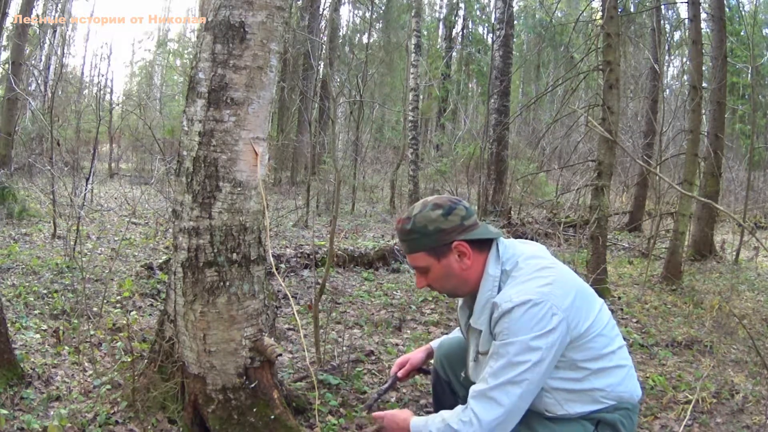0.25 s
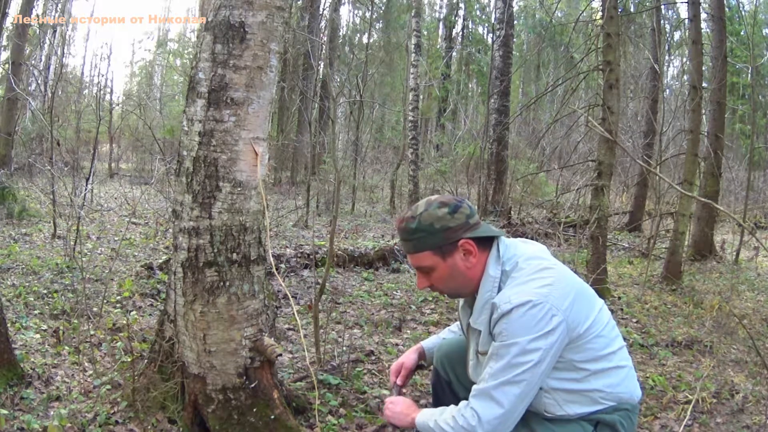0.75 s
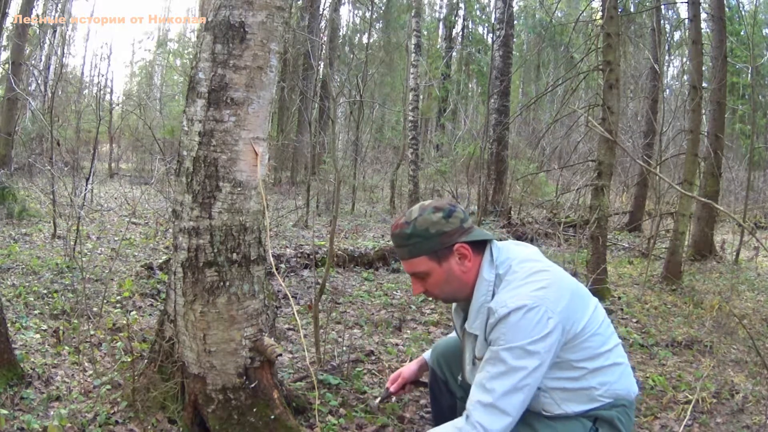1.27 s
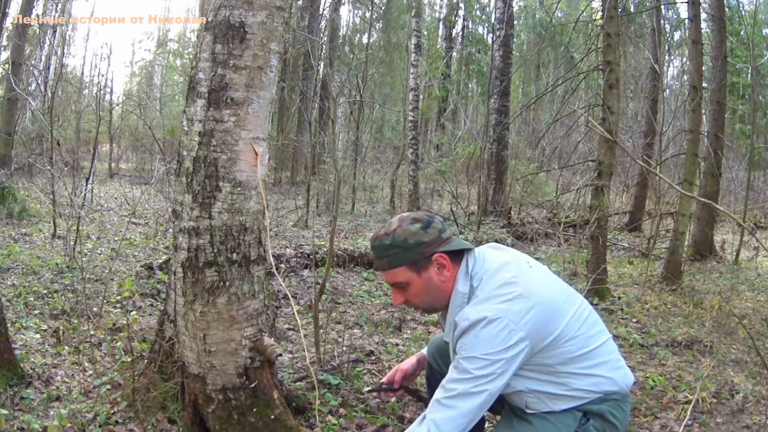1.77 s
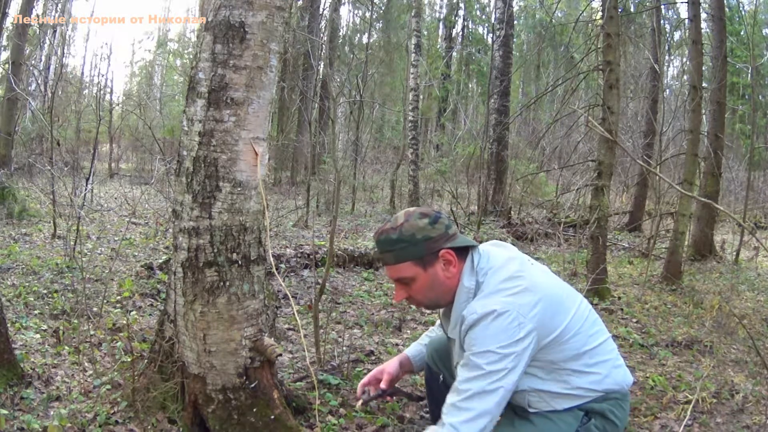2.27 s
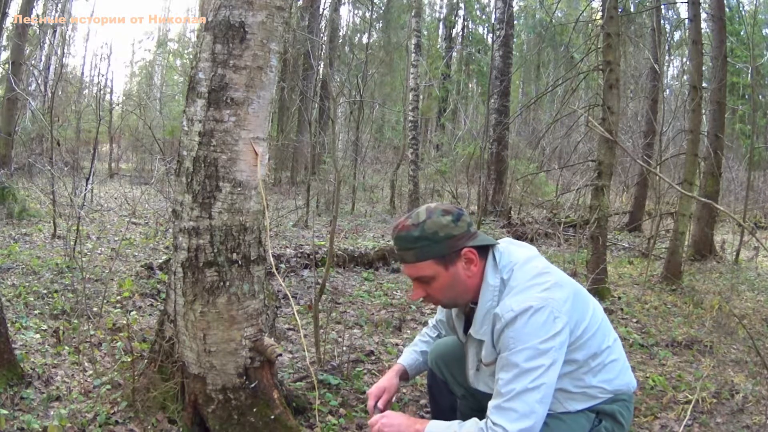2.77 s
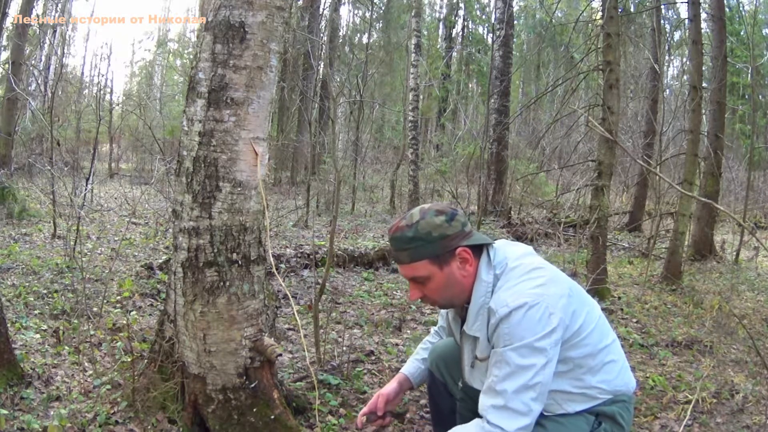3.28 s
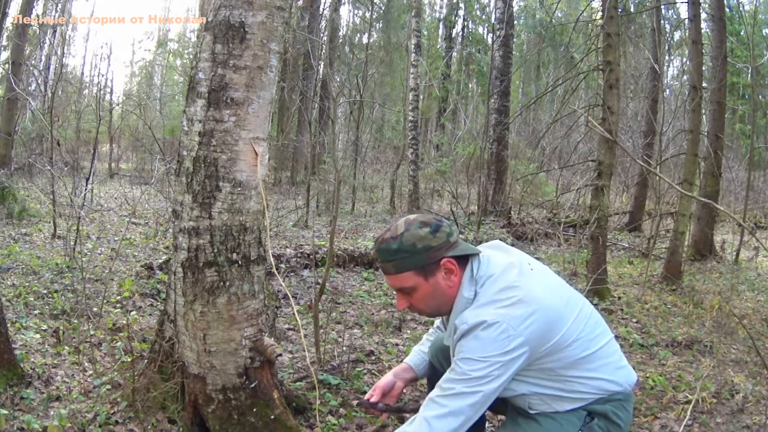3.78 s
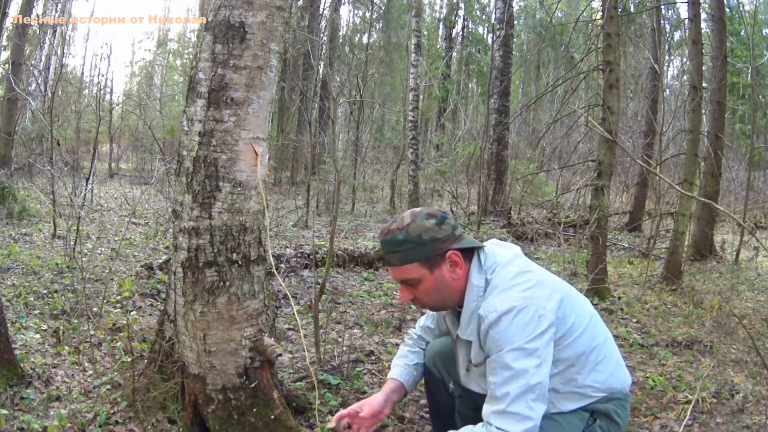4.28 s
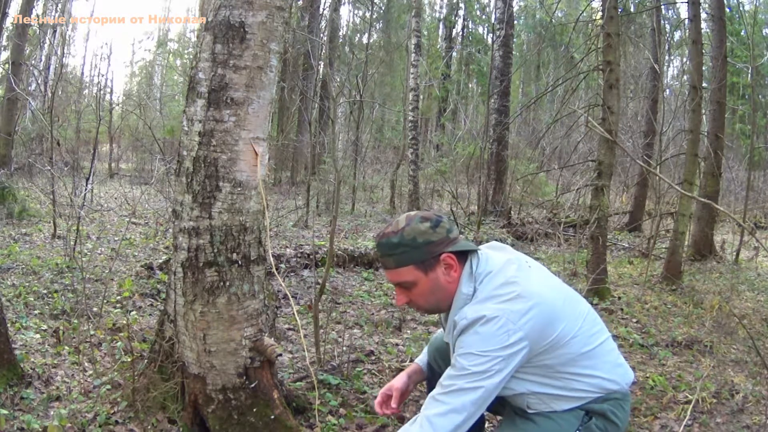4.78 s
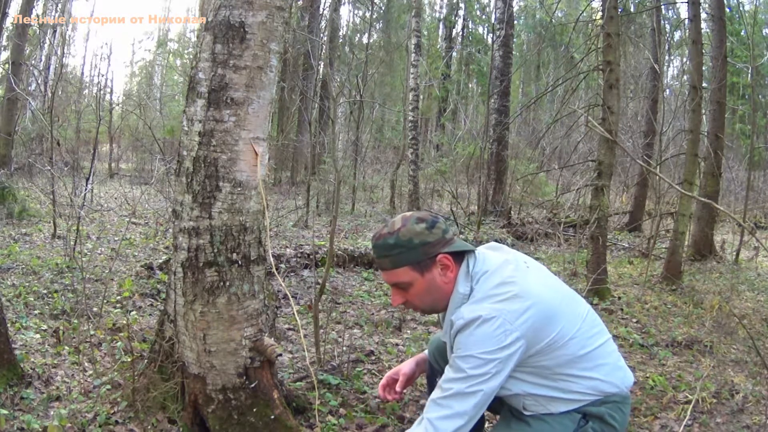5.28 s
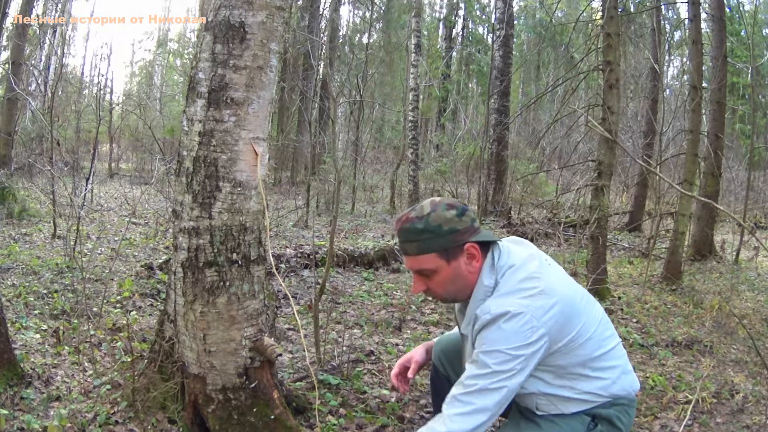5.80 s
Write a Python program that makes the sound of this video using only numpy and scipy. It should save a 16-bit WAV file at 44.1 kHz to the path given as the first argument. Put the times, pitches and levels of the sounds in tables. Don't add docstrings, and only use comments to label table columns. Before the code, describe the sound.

Close to a small stereo microphone outdoors in quiet woods, fingertips pick lightly at crisp dry leaves. A twig cracks, then the hand rakes into duller, damp litter. Picking resumes and a second, sharper twig snap jolts the microphone. Raking returns with crunching stalks while a distant bird gives faint gliding whistles. Soft air and hiss run throughout.

```python
import sys
import numpy as np
from scipy import signal
from scipy.fft import rfft, irfft, next_fast_len
from scipy.io import wavfile
from scipy.ndimage import uniform_filter1d, map_coordinates

SR = 44100
rng = np.random.default_rng(int(sys.argv[2]) if len(sys.argv) > 2 else 0)


def gain_from_decibels(decibels):
    exponent = np.asarray(decibels, float) / 20
    return 10 ** exponent


def dump_mix(stems):
    frames = np.atleast_2d(stems).T
    limited = np.clip(frames, -1, 1)
    pcm = np.round(limited * 32767).astype(np.int16)
    wavfile.write(sys.argv[1], SR, pcm)


N = 266672

# f/Hz, level/dB
AIR_SPECTRUM = [(15, -64.5), (25, -35), (130, -24.5), (300, -11), (520, -5), (1030, -7), (1800, -14.5),
                (4000, -11.5), (6700, -16.5), (8200, -16.5), (10100, -22), (12500, -26.5), (15600, -23),
                (15900, -55), (16150, -89)]
# f/Hz, likeness/1
AIR_ALIKE = [(30, .95), (120, 0.25), (500, 0.39), (2000, 0.075), (4000, 0.7), (8000, 0.71), (15000, 0.89)]
# t/s, f/Hz, level/dB
BIRD_NOTES = [
    [(3.18, 2446, -74), (3.205, 2370, -69), (3.238, 2300, -68)],
    [(3.255, 2090, -73), (3.275, 2270, -70), (3.305, 2260, -67), (3.335, 2240, -79)],
    [(3.35, 2200, -70), (3.37, 2160, -74), (3.39, 2280, -75)],
    [(3.47, 2550, -72), (3.5, 2480, -63), (3.54, 2320, -59), (3.59, 1960, -67), (3.63, 2010, -71)],
    [(4.07, 3000, -72), (4.106, 2880, -62), (4.15, 2720, -59.5), (4.163, 2680, -71), (4.176, 2650, -55.5),
     (4.19, 2590, -62), (4.215, 2500, -56), (4.235, 2400, -56), (4.255, 2360, -57)],
    [(4.2, 2720, -72), (4.24, 2680, -61)],
    [(4.265, 1740, -54), (4.295, 1754, -73)],
    [(4.33, 2350, -73), (4.39, 2330, -66)],
    [(4.33, 1830, -76), (4.35, 1870, -63), (4.395, 1900, -70), (4.425, 1920, -59), (4.455, 2550, -61.5),
     (4.495, 2765, -62), (4.53, 2790, -75), (4.57, 2750, -72), (4.6, 2770, -80)],
    [(4.44, 1915, -70), (4.475, 1915, -80), (4.5, 1930, -68), (4.53, 1910, -78), (4.555, 1910, -64),
     (4.58, 1900, -82)],
]
# delay/s, level/dB
TRUNK_ECHOES = [
    (0.044, -16),
    (0.089, -13),
]
# f/Hz, t60/s
TRUNK_T60 = [(300, 0.33), (2000, 0.19), (8000, 0.19)]
# f/Hz, level/dB
SOIL_SPECTRUM = [(200, -32), (400, -6), (650, 1), (900, -3), (1500, -28), (4000, -78)]
# f/Hz, level/dB
CRISP_SPECTRUM = [(710, -42), (1200, -10), (1430, -8.5), (2120, -6), (3150, -5), (4570, -1), (5570, -0.5),
                  (7830, -3), (9300, -11.5), (10300, -15), (11400, -8.5), (13000, -9.5), (15600, -18),
                  (15900, -51), (16150, -89)]
# f/Hz, level/dB
DAMP_SPECTRUM = [(60, -68.5), (200, -37), (400, -16), (800, -2.5), (1500, 0.5), (2500, -2), (5000, -28),
                 (14000, -75.5)]
# f/Hz, likeness/1
LEAF_ALIKE = [(500, 0.72), (1000, 0.94), (2000, 0.96), (5000, 0.91), (8500, 1), (12000, 1)]
# t/s, contact/s, start level/dB, end level/dB
PICKS = [(0, .06, -59.5, -66), (0.22, 0.045, -63, -57), (0.25, 0.065, -56.5, -66), (0.457, 0.049, -43, -50),
         (0.575, 0.023, -55.5, -47.5), (0.62, 0.16, -57.5, -54), (0.8, 0.089, -36, -56.5),
         (0.87, .1, -59, -52.5), (0.98, 0.042, -73, -58), (1.06, 0.06, -53, -61), (1.13, 0.074, -62, -51),
         (1.23, 0.067, -65, -61), (2.48, 0.027, -45.5, -47), (2.54, .03, -48.5, -47.5),
         (2.57, 0.13, -49, -52), (2.73, 0.045, -54, -45.5), (2.775, 0.084, -50, -53),
         (2.875, 0.044, -55, -35), (2.92, 0.055, -31.5, -48), (2.97, 0.092, -46.5, -55),
         (3.07, 0.15, -54, -56.5), (3.41, .025, -48.5, -55), (4.16, 0.099, -53, -58),
         (4.25, 0.015, -48, -46.5), (4.445, 0.013, -52.5, -57)]
# t/s, contact/s, start level/dB, end level/dB
RAKES = [(1.37, 0.088, -59.5, -56), (1.47, 0.12, -57, -61), (1.56, 0.063, -54.5, -47),
         (1.61, 0.13, -52.5, -42), (1.75, 0.079, -46.5, -51), (1.885, 0.1, -41.5, -55.5),
         (2.015, 0.078, -43.5, -50), (2.105, .06, -43, -54), (2.195, 0.024, -46, -45.5),
         (2.25, 0.21, -57, -69), (3.3, 0.17, -58.5, -57.5), (3.44, 0.22, -62.5, -41),
         (3.7, 0.076, -41.5, -44.5), (3.825, .11, -40.5, -57), (3.95, 0.16, -56, -62),
         (4.1, 0.074, -59.5, -56), (4.3, .1, -60.5, -64.5), (4.42, 0.17, -73, -48),
         (4.655, 0.032, -44.5, -44), (4.712, .13, -39.5, -51), (4.85, 0.049, -51.5, -57.5),
         (4.96, 0.14, -47, -40), (5.1, 0.075, -41, -55), (5.21, 0.034, -47, -45), (5.27, 0.086, -66, -58.5),
         (5.425, 0.13, -47.5, -37.5), (5.56, 0.028, -36.5, -42.5), (5.62, 0.042, -59, -59),
         (5.715, 0.07, -52.5, -43.5), (5.81, 0.13, -51.5, -65)]
# t/s, level/dB
WEIGHT = [(0, -87), (0.25, -62.5), (0.6, -77), (0.78, -81), (1.05, -68), (1.5, -62), (2.35, -62),
          (2.5, -65), (2.8, -85), (3, -57), (3.1, -76), (3.3, -63), (4, -61), (4.5, -64), (5.4, -70),
          (5.68, -64), (6.05, -59.5)]
# t/s, peak level/dB, f/Hz
SPECKS_EARLY = [(0.0215, -46, 6100), (0.1022, -49, 3000), (0.1071, -45, 7200), (0.2228, -49, 4800),
                (0.237, -43, 3600), (0.254, -46, 3100), (0.2607, -44, 6900), (0.2912, -50, 4400),
                (0.3222, -49, 6600), (0.3398, -55, 4900), (0.3482, -51, 3400), (0.3815, -57, 6400),
                (0.478, -38, 5100), (0.6021, -31, 7650), (0.6128, -43, 7000), (0.6248, -49, 8000),
                (0.6474, -38, 7600), (0.719, -41, 4400), (0.8586, -45, 6600), (0.865, -43, 4700),
                (0.892, -33, 7840), (0.9186, -49, 5000), (0.9368, -52, 4900), (1.0208, -46, 6070),
                (1.0257, -50, 4900), (1.038, -59, 4600), (1.0767, -44.5, 5170), (1.164, -48, 5900),
                (1.2306, -44, 6200), (1.2606, -47, 6160), (1.2735, -48, 3900), (1.288, -54, 5300),
                (1.324, -45, 5560), (1.3803, -49, 4600), (1.4188, -54, 6300), (1.4533, -44, 2200),
                (1.5594, -50, 5900), (1.606, -40, 7500), (1.645, -35, 7260), (1.8099, -35, 4030),
                (1.827, -40, 5860), (1.97, -40, 5500), (1.9772, -44, 6500), (2.1176, -42, 6140),
                (2.1239, -29, 7900), (2.1648, -42, 5300), (2.3146, -44, 7660), (2.354, -51, 6900),
                (2.4602, -40.5, 4200), (2.4971, -29, 7600), (2.5174, -50, 5900), (2.5492, -49, 4000),
                (2.576, -35, 7100), (2.7894, -37, 7240), (2.8061, -35, 7700), (2.8263, -46, 5100),
                (2.8476, -41, 6600), (2.8537, -51, 5500), (2.8641, -48, 4500), (2.8701, -46, 5200)]
# t/s, peak level/dB, f/Hz
SPECKS_LATE = [(2.8764, -41, 4700), (2.9678, -41, 6300), (3.1065, -40, 5400), (3.1291, -46, 7800),
               (3.148, -47, 4600), (3.1569, -50, 8400), (3.2204, -57, 2800), (3.2345, -55, 5100),
               (3.2398, -40.5, 4000), (3.2739, -51, 6500), (3.291, -40, 5250), (3.3294, -47, 6800),
               (3.3737, -45, 6200), (3.4034, -42, 5300), (3.4166, -46, 5600), (3.4324, -44, 5300),
               (3.4598, -47, 5200), (3.5482, -43, 5300), (3.6322, -65, 5500), (3.6532, -48, 8400),
               (3.6708, -49, 5300), (3.7595, -30, 3430), (3.811, -35, 4670), (4.0118, -49, 4100),
               (4.175, -39, 2500), (4.1911, -47, 4700), (4.2361, -43, 4600), (4.2444, -40, 7100),
               (4.291, -49, 7500), (4.3113, -48, 2800), (4.4485, -48, 2200), (4.5245, -49, 3800),
               (4.5303, -43, 3800), (4.5424, -46, 3600), (4.564, -47, 4240), (4.5807, -46, 4470),
               (4.6492, -49, 5500), (4.66, -40, 4500), (4.6789, -27.5, 5300), (4.761, -42, 5000),
               (4.821, -40, 5400), (4.8527, -41, 7300), (5.0104, -33, 7240), (5.0215, -38, 6100),
               (5.0542, -35, 4700), (5.1097, -35, 6640), (5.1694, -38, 4900), (5.3559, -48, 6400),
               (5.4647, -29, 5300), (5.478, -40, 5100), (5.5005, -32, 5900), (5.6673, -50, 5300),
               (5.6828, -52, 4500), (5.7198, -40, 3900), (5.7404, -37, 5400), (5.7483, -41, 5600),
               (5.7945, -36, 5550), (5.82, -44, 5900), (5.8364, -49, 3800)]
# t/s, peak level/dB, decay/ms, knock level/dB
TICKS = [(0.1125, -42.5, 3.1, -17), (0.13, -40, 0.65, -9), (0.164, -46.5, 5.6, -5.5),
         (0.2694, -37, 0.37, -10), (0.3024, -36.5, 2.1, -19.5), (0.4577, -32.5, 0.73, -10),
         (0.4614, -32.5, 2.5, -25), (0.5416, -39.5, 0.77, -4), (0.6007, -35, 0.69, -15),
         (0.656, -36, 1.3, -17), (0.6937, -29, 1.8, -36.5), (0.859, -38, .6, 3), (0.8729, -39, 1.2, -5),
         (0.89, -41, 0.53, -22), (0.9431, -30, 1.6, -8.5), (1.1389, -37, .73, -14),
         (2.2803, -33, 0.36, -23), (2.483, -39, 1.8, -13), (2.4898, -32.5, 2.1, -22.5),
         (2.629, -35, 1.8, -14), (2.6834, -36, 4, -19.5), (2.726, -25, 0.3, -22.5),
         (2.7353, -40.5, 3.6, -25), (2.7656, -29.5, 0.7, -25), (2.78, -41, 1.3, -31.5),
         (2.836, -27, 0.17, -13), (3.0784, -34.5, 1.2, -23), (3.082, -34.5, 3.7, -13), (3.35, -39, 1.4, -8),
         (3.3607, -36, 1.4, -20.5)]
# t/s, peak level/dB, decay/ms, knock level/dB
CRUNCHES = [(1.687, -28, 0.42, -22), (1.72, -33, 1.6, -18), (1.883, -33, 2.3, -16),
            (2.0246, -29.5, 1.8, -18), (2.0542, -37, 5.4, -11), (2.089, -32.5, 4.3, -15.5),
            (2.114, -41, 2.5, -15), (2.141, -39, 1.3, -19), (2.143, -33.5, 0.84, -12),
            (2.1468, -27, .5, -22), (2.2052, -33, 0.94, -7), (3.6913, -22, 1, -1),
            (3.8356, -22.5, 0.75, -10.5), (3.996, -49, 1.35, 7), (4.259, -27, 1.1, -17.5),
            (4.2648, -26.5, 1.1, -21.5), (4.6733, -32, 0.62, -8), (4.7005, -28, 1.5, -7),
            (5.0495, -36, 1.1, -1), (5.1015, -32.5, 1, -6), (5.1594, -35, 3.3, -12), (5.201, -42, 1.3, -18),
            (5.214, -33.5, 0.48, 2.5), (5.2265, -32.5, 2.2, -22), (5.034, -35, 1.3, -1.5),
            (5.07, -38, 1.5, -15), (5.449, -30, 0.91, -18), (5.5116, -35.5, 2, -3), (5.5238, -30, 1.2, -18),
            (5.5532, -32, 1.5, -1.5), (5.577, -28, 1.3, -15), (5.602, -34, 1.3, -6),
            (5.702, -36.5, 1.3, -12), (5.6195, -42, .8, -22), (5.632, -43, .8, -12), (5.646, -45, .8, -24),
            (5.464, -35.5, 1, -9)]
# t/s, peak level/dB, f/Hz, decay/ms
TWIG_ONE = [
    (0.738, -38, 5850, 2.5),
    (0.7657, -18, 4500, 0.59),
    (0.7746, -26.5, 5150, 1.8),
    (0.7991, -11, 4770, 0.67),
    (0.8012, -19, 5490, 3.5),
    (0.8044, -7.5, 4420, 1.23),
    (0.8082, -11.5, 4270, 2.7),
    (0.8103, -17, 4600, 1.3),
    (0.8145, -23, 4750, 3.4),
    (0.823, -29.5, 5130, 2.7),
]
# t/s, peak level/dB, f/Hz, decay/ms
TWIG_TWO = [(2.8816, -31, 6800, 1.2), (2.8938, -27, 5230, 0.5), (2.896, -35, 4900, 0.88),
            (2.9, -27, 6500, 1.5), (2.9071, -18, 6200, 2), (2.9123, -18, 4300, 1.4),
            (2.9139, -13, 7050, 1.2), (2.9189, -19.5, 4340, 0.91), (2.9256, -2, 6460, 0.3),
            (2.9261, -6, 2700, .5), (2.9268, -6, 2400, 0.45), (2.9274, -13, 2700, .5),
            (2.9282, -28, 5160, 4.4), (2.9403, -28, 5260, 2.5)]
TWIG_KNOCKS_DB = [
    -21.5,
    -26,
]
# f/Hz, level/dB
CRACK_SPECTRUM = [(60, -80), (200, -46.5), (1070, -22), (1770, -22.5), (2210, -15.5), (2750, -17),
                  (3020, -10), (4620, -10), (7600, -8.5), (9900, -19), (12200, -17), (15500, -20),
                  (16100, -60)]
# f/Hz, level/dB
KNOCK_SPECTRUM = [(150, -32), (400, -12), (900, 1.5), (1600, -4.5), (2400, -1), (4000, -29.5),
                  (9000, -78.5)]
# f/Hz, phase/rad
PORT_LEAD = [(60, 0.11), (170, 1.64), (400, 1.3), (900, 1.7), (2000, 0.98), (3500, 0.56), (7500, 0.05),
             (12000, .02)]
JOLT_DB = [
    [-21],
    [-11.5],
]


def unit(x):
    return x / np.sqrt(np.mean(x ** 2) + 1e-20)


def along(points, hz):
    f, v = np.transpose(points)
    return np.interp(np.log(hz + 1), np.log(f + 1), v)


def wobble(rate_hz):
    knots = rng.standard_normal(int(N * rate_hz / SR) + 4)
    return map_coordinates(knots, [np.arange(N) * rate_hz / SR])


def filtered(x, response):
    m = next_fast_len(N + 8192)
    return irfft(rfft(x, m) * response(np.fft.rfftfreq(m, 1 / SR)), m)[..., :N]


def causal(spectrum):
    def response(hz):
        cepstrum = irfft(np.log(gain_from_decibels(np.maximum(along(spectrum, hz), -90))))
        half = len(cepstrum) // 2
        cepstrum[1:half] *= 2
        cepstrum[half + 1:] = 0
        return np.exp(rfft(cepstrum))
    return response


def spread(pair, spectrum, alike):
    colour = causal(spectrum)

    def mid_side(hz):
        angle_rad = np.arccos(np.clip(along(alike, hz), 0, 1)) / 2
        return colour(hz) * [np.cos(angle_rad), np.sin(angle_rad)]
    mid, side = filtered(pair, mid_side)
    return np.array([mid + side, mid - side])


def air():
    bed = unit(spread(rng.standard_normal((2, N)), AIR_SPECTRUM, AIR_ALIKE))
    return gain_from_decibels(-62.67 + 0.22 * wobble(2.3)) * bed


def bird():
    edge_s = 0.0089
    t, x = np.arange(N) / SR, np.zeros(N)
    waver_hz = 22 * wobble(60)
    for note in BIRD_NOTES:
        s, hz, db = np.transpose(note)
        edge = np.clip(1 + np.minimum(t - s[0], s[-1] - t) / edge_s, 0, 1)
        gain = gain_from_decibels(np.interp(t, s, db)) * edge
        phase = 2 * np.pi * np.cumsum(np.interp(t, s, hz) + waver_hz) / SR
        x += np.sqrt(2) * gain * np.sin(phase)
    return x * gain_from_decibels(3 * wobble(70))


def trunks(x):
    hz, t, z = signal.stft(rng.standard_normal((2, SR // 2)), SR, nperseg=256)
    decay = gain_from_decibels(-60 * t / along(TRUNK_T60, hz)[:, None])
    tail = signal.istft(z * decay, SR, nperseg=256)[1]
    delayed = np.pad(x, (600, 0))[None]
    return signal.fftconvolve(delayed, tail / np.linalg.norm(tail[0]), axes=1)[:, :N]


def thud():
    middle_s, half_length_s = 5.952, 0.021
    swell = np.exp(-((np.arange(N) / SR - middle_s) / half_length_s) ** 2)
    return gain_from_decibels(-63) * swell * unit(spread(rng.standard_normal((2, N)), SOIL_SPECTRUM, LEAF_ALIKE))


def strokes(rows, rise_s, fall_s):
    t, level_db = np.arange(N) / SR, np.full(N, -120.)
    for s, hold_s, start_db, end_db in rows:
        times_s = [s - 6 * rise_s, s, s + hold_s, s + hold_s + 6 * fall_s]
        stroke_db = np.interp(t, times_s, [start_db - 60, start_db, end_db, end_db - 60])
        level_db = np.maximum(level_db, stroke_db)
    return gain_from_decibels(2 * level_db)


def puffs(per_s, spread_db, decay_ms):
    when, size = rng.random((2, N))
    sparks = (when < per_s / SR) * gain_from_decibels(-2 * spread_db * np.log(1 - size * (1 - 1 / 40)))
    power = signal.lfilter([1], [1, -np.exp(-2000 / (decay_ms * SR))], sparks)
    return power / power.mean()


def crackle(per_s, size_db, decay_ms, bed_db):
    fine = puffs(per_s, size_db, decay_ms) + gain_from_decibels(2 * bed_db)
    clumps = puffs(60, 1.8, 7) + gain_from_decibels(2 * 5)
    z = signal.stft(np.sqrt(fine * clumps) * rng.standard_normal((2, N)), nperseg=128)[2]
    field = uniform_filter1d(rng.standard_normal(z.shape[1:]), size=7, axis=0)
    field = uniform_filter1d(field, size=4, axis=1)
    leaf_colour = gain_from_decibels(2 * unit(field))
    return unit(signal.istft(z * leaf_colour, nperseg=128)[1][:, :N])


def litter():
    picks = strokes(PICKS, rise_s=0.0037, fall_s=0.025)
    rakes = strokes(RAKES, rise_s=0.025, fall_s=0.028)
    weight = gain_from_decibels(2 * np.interp(np.arange(N) / SR, *np.transpose(WEIGHT)))
    crisp_grains = crackle(450, size_db=2, decay_ms=0.4, bed_db=4)
    damp_grains = crackle(250, size_db=3, decay_ms=0.5, bed_db=6)
    crisp = unit(spread(crisp_grains, [(100, -98)] + CRISP_SPECTRUM, LEAF_ALIKE))
    damp = unit(spread(damp_grains, DAMP_SPECTRUM, LEAF_ALIKE))
    pick_damp_db, rake_damp_db = -39, -6
    pressed = gain_from_decibels(2 * pick_damp_db) * picks + gain_from_decibels(2 * rake_damp_db) * rakes + weight
    return gain_from_decibels(-3) * np.sqrt(picks + rakes) * crisp + gain_from_decibels(-4.5) * np.sqrt(pressed) * damp


def specks():
    decay_ms, gain_db, broad_share = 0.76, 2, 0.71
    x, t = np.zeros((2, N + 512)), np.arange(512) / SR
    shape = gain_from_decibels(-8000 * t / decay_ms) * (1 - np.exp(-t / 0.00005))
    for s, db, hz in SPECKS_EARLY + SPECKS_LATE:
        noise = rng.standard_normal((2, 2, len(t)))
        tone = np.sin(2 * np.pi * hz * t)
        band = 2 * uniform_filter1d(noise[0], size=9) * tone
        burst = shape * (tone * [[0.6], [0.2]] + band + broad_share * noise[1])
        burst *= np.linalg.norm(shape) / np.linalg.norm(burst[0])
        x[:, round(s * SR):][:, :len(t)] += gain_from_decibels(db + gain_db) * burst
    return spread(x[:, :N], [(100, -98)] + CRISP_SPECTRUM, LEAF_ALIKE)


def fractures():
    rows = []
    for twig, knock_db in zip((TWIG_ONE, TWIG_TWO), TWIG_KNOCKS_DB):
        rows += [(*row, knock_db) for row in twig]
    for s, db, ms, knock_db in TICKS + CRUNCHES:
        ring_hz = 4135 * gain_from_decibels(-0.1294 * knock_db)
        rows.append((s, db, ring_hz, ms, knock_db))
    return rows


def snaps():
    x, t = np.zeros((2, 2, N + 1536)), np.arange(1536) / SR
    for s, db, hz, ms, knock_db in fractures():
        noise, ms = rng.standard_normal((3, 2, len(t))), max(ms, 0.1)
        shape = gain_from_decibels(-8000 * t / ms) * (1 - np.exp(-t / (0.00008 * ms)))
        ring = 0.7 * np.sin(2 * np.pi * hz * t) * [[1], [0.3]]
        rattle = gain_from_decibels(-60 * t / 0.03) * noise[1] / 8
        tear = shape * (noise[0] + ring)
        crack = tear * np.linalg.norm(shape) / np.linalg.norm(tear[0]) + rattle
        knock = gain_from_decibels(knock_db - 5.5) * np.sqrt(shape) * noise[2]
        x[..., round(s * SR):][..., :len(t)] += gain_from_decibels(db + 9.5) * np.array([crack, knock])
    cracks, knocks = x[..., :N]
    return spread(cracks, CRACK_SPECTRUM, LEAF_ALIKE) + spread(knocks, KNOCK_SPECTRUM, LEAF_ALIKE)


def scene():
    near, song = snaps() + specks(), bird()
    echoes = sum(gain_from_decibels(db) * np.roll(song, round(s * SR)) for s, db in TRUNK_ECHOES)
    scattered = trunks(gain_from_decibels(-28) * near[0] + gain_from_decibels(-7) * song)
    return air() + song + echoes + scattered + thud() + litter() + near


def roll_off(x):
    return signal.sosfilt(signal.butter(12, 16670, fs=SR, output="sos"), x)


def record(dry):
    jolt_s, jolt_hz = 2.926, 405
    lead = filtered(dry, lambda hz: np.exp(0.5j * along(PORT_LEAD, hz) * [[-1], [1]]))
    ports = gain_from_decibels([[0.3], [-0.3]]) * lead
    shove = 1. * (np.arange(N) == round(jolt_s * SR))
    push = filtered(shove, lambda hz: 1 / (1 + 1j * hz / jolt_hz))
    return roll_off(ports - gain_from_decibels(JOLT_DB) * push)


dry = scene()
out = record(dry)
dump_mix(out)
```